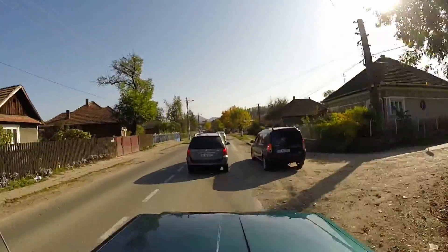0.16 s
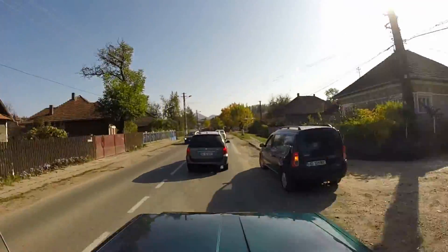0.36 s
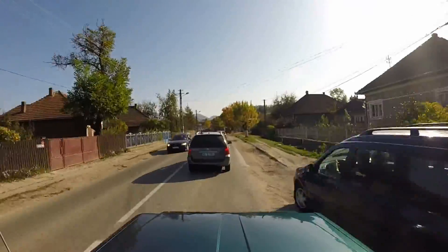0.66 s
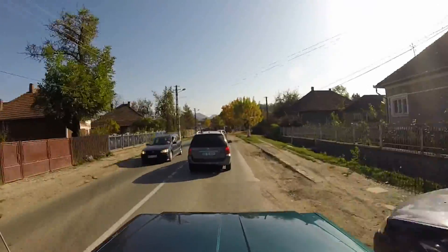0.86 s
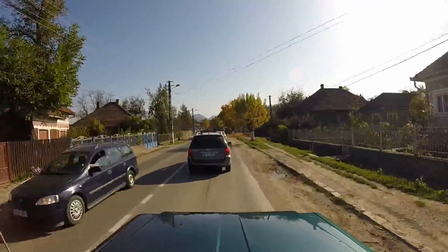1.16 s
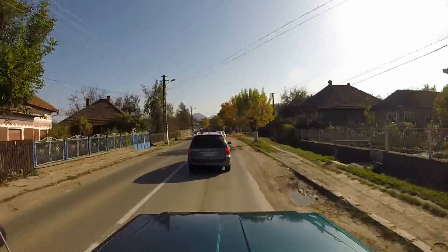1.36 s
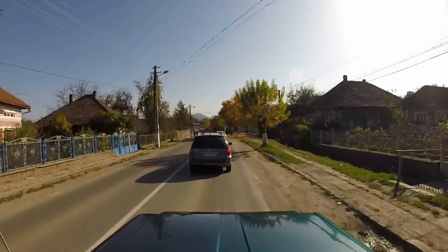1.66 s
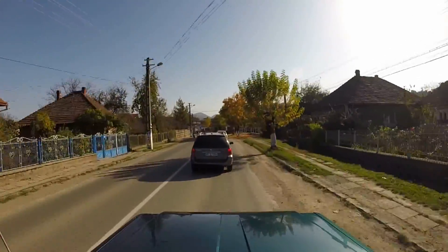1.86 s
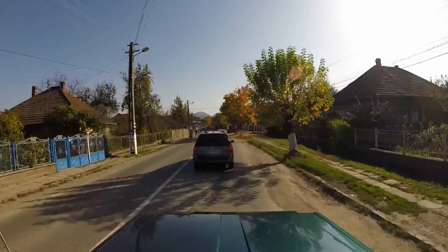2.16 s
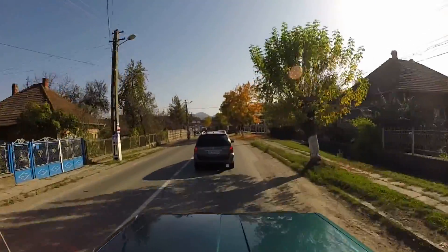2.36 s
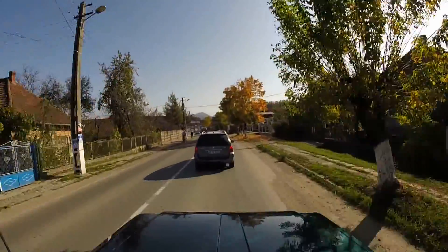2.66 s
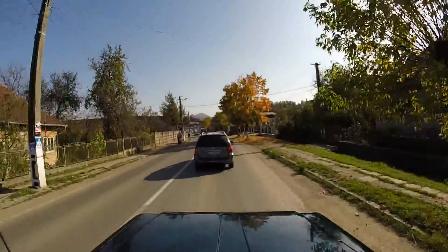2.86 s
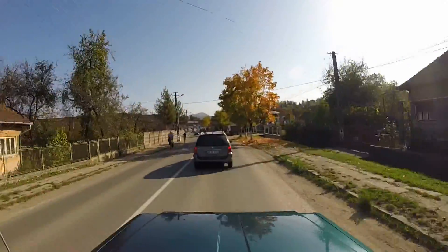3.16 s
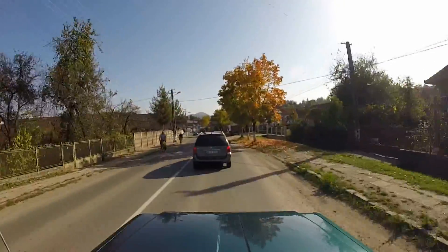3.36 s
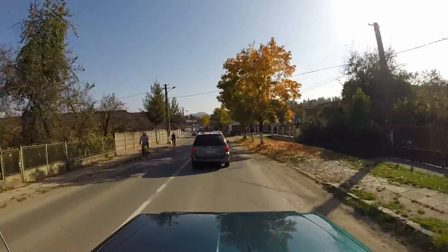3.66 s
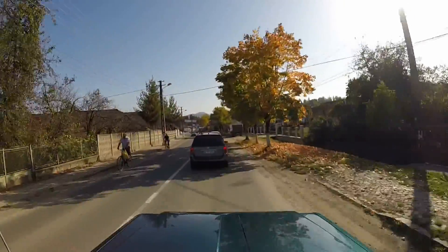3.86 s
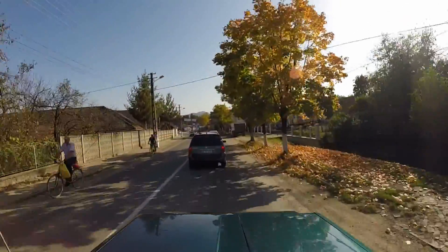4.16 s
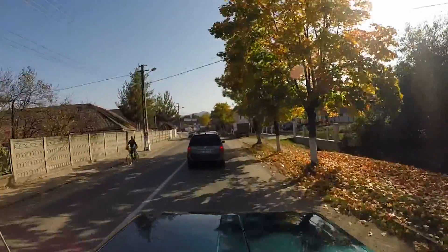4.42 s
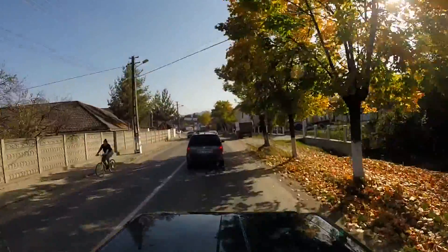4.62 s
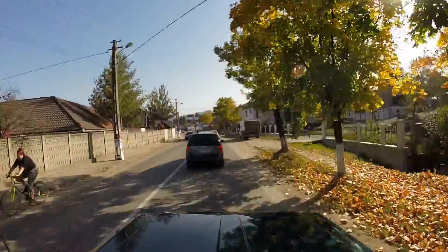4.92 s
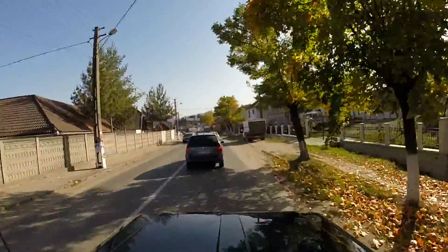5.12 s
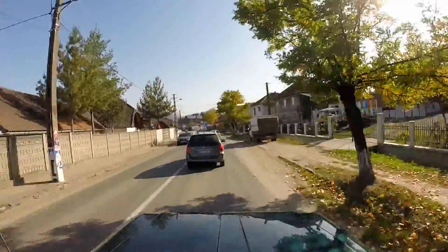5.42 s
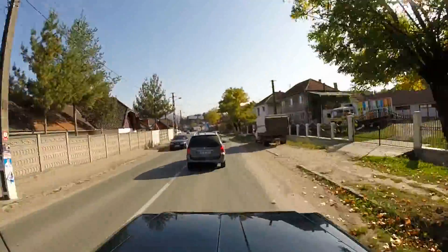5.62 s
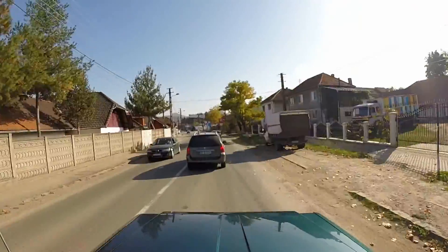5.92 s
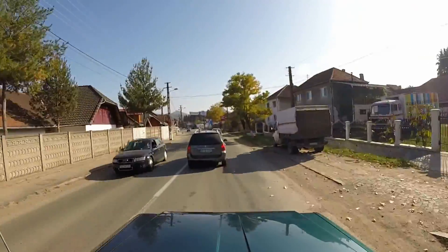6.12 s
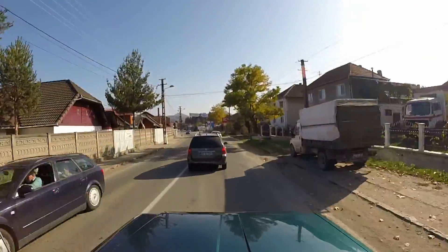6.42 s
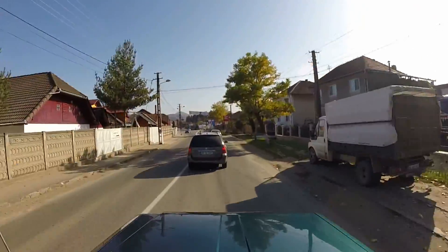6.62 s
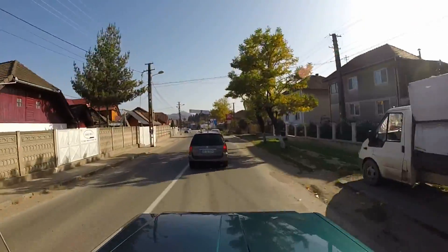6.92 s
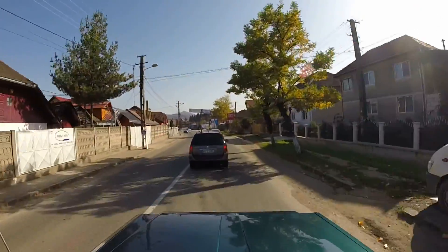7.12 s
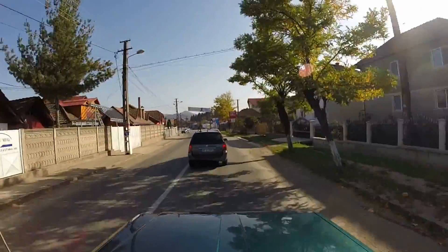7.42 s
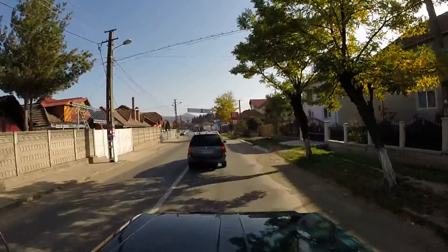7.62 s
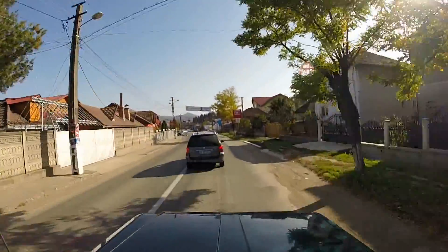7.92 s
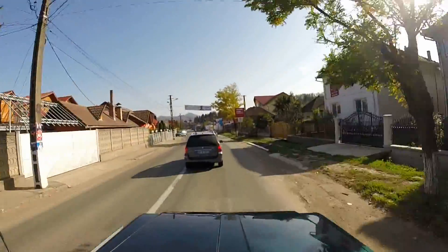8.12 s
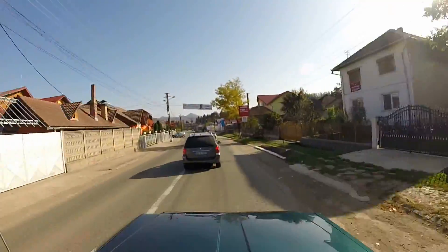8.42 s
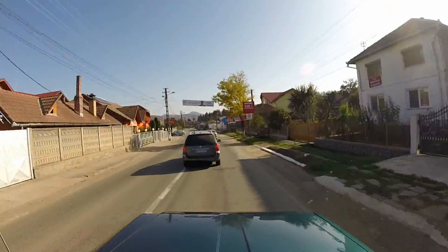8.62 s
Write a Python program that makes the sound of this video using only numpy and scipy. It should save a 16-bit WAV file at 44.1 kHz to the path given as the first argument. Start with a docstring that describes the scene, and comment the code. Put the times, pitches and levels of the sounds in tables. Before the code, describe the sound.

One microphone mounted outdoors on a moving car catches continuous deep boom, humming engine and drive line, and coarse road roar. Crackling puffs of wind crowd the first half, with breathy high hiss and whistle coming and going. Small bumps knock the wheels; two much harder ones thud and rattle, and the whole sound dips after each. Close vehicles pass as short swishes, and the tyres sing faintly towards the end.

```python
"""Booming and humming, an off-road car drives steadily through a village, heard from outside above its bonnet.
The tyres roar and thump over bumps; a parked car throws the noise back briefly, then moving cars
swish by, close to the side. Wind buffets the camera, rasps in its housing in puffs and whistles at an edge.
Body, tyres and wind are coloured noise, shafts and whistles are sines, bumps are struck resonances.
One microphone takes it all; its limiter ducks the whole sound after the two hardest bumps."""
import sys
import numpy as np
from scipy import signal
from scipy.fft import rfft, irfft, next_fast_len
from scipy.io import wavfile
from scipy.ndimage import uniform_filter1d, minimum_filter1d, map_coordinates

SR = 44100
rng = np.random.default_rng(int(sys.argv[2]) if len(sys.argv) > 2 else 0)


def transcribe(signal):
    """Save signal, clipped to [-1, 1], as a 16-bit WAV file at the path in sys.argv[1]."""
    frames = np.atleast_2d(signal).T
    limited = np.clip(frames, -1, 1)
    pcm = np.round(limited * 32767).astype(np.int16)
    wavfile.write(sys.argv[1], SR, pcm)


N = 387193
T = np.arange(N) / SR
# Levels in the tables are relative: the functions trim them. Noise spectra set colour only.


def amp(db):
    """Decibels to gain."""
    return 10 ** (np.asarray(db) / 20)


def unit(x):
    """Scale to rms 1."""
    return x / np.sqrt(np.mean(x ** 2) + 1e-20)


def curves(rows):
    """One value per sample for each column after the time."""
    s, *cols = np.transpose(rows)
    return [np.interp(T, s, c) for c in cols]


def wobble(rate):
    """A smooth random curve, rate knots a second."""
    knots = rng.standard_normal(int(N * rate / SR) + 4)
    return map_coordinates(knots, [T * rate])


def filtered(x, response):
    """x times a response of frequency."""
    size = next_fast_len(N + 8192)
    return irfft(rfft(x, size) * response(np.fft.rfftfreq(size, 1 / SR)), size)[:N]


def noise(spectrum):
    """Noise of rms 1 with the colour of (freq_hz, level_db) points."""
    f, db = np.transpose(spectrum)

    def colour(hz):
        return amp(np.interp(np.log(hz + 1), np.log(f), db))
    return unit(filtered(rng.standard_normal(N), colour))


def even(x, span):
    """Hold the strength of a noise even over span seconds."""
    size = max(int(span * SR), 2)
    power = uniform_filter1d(uniform_filter1d(x ** 2, size), size)
    return x / np.sqrt(np.abs(power) + 1e-4)


def add(track, s, sound):
    """Mix a sound into the track at s seconds."""
    part = track[max(round(s * SR), 0):][:len(sound)]
    part += sound[:len(part)]


def hum(hz, tones, waver_db, rough):
    """The (multiple, level_db) tones of a slightly unevenly turning shaft."""
    phase = 2 * np.pi * np.cumsum(hz) / SR + rough * wobble(18)
    out = np.zeros(N)
    for multiple, db in tones:
        start = rng.uniform(0, 2 * np.pi)
        out += amp(db + waver_db * wobble(6)) * np.sin(multiple * phase + start)
    return out


# air buffeting the camera: start_s, level_db
BUFFETING = [(0.0, -11), (0.07, -19), (0.09, -22.5), (0.9, -13), (0.98, -25.5), (1.56, -13), (1.61, -22.5),
             (2.15, -19.5), (2.25, -32), (2.35, -9.5), (2.52, -27), (2.76, -13), (2.83, -33), (2.93, -24.5),
             (3.54, -38), (3.74, -14.5), (3.86, -24), (4.67, -40), (5.21, -22), (6.77, -26.5), (7.58, -19),
             (8.19, -34), (8.21, -19.5), (8.78, -18.5)]
# the body booming on its springs: start_s, level_db
BOOMING = [(0.0, -17.5), (0.05, -14), (0.12, -21.5), (0.37, -9), (0.41, -19), (0.95, -11), (1.0, -29.5),
           (1.17, -14.5), (1.46, -22.5), (1.71, -10.5), (1.76, -26), (1.91, -15.5), (3.13, -14),
           (3.18, -26), (3.35, -13.5), (3.57, -24), (3.62, -15), (3.89, -19.5), (4.05, -13), (4.11, -24),
           (4.2, -13.5), (4.62, -23.5), (4.89, -13), (4.94, -28), (5.11, -17), (5.7, -14), (6.28, -24.5),
           (6.38, -12), (6.45, -10), (6.51, -20.5), (6.6, -13), (6.92, -22.5), (7.04, -11), (7.09, -22.5),
           (7.29, -23), (7.63, -8.5), (7.7, -29), (7.78, -11.5), (8.29, -21.5), (8.53, -10.5), (8.78, -14)]
# where the boom is centred: start_s, pitch_hz
BOOM_PITCH = [(0, 58), (1.5, 57), (2.4, 61), (3.1, 61), (3.65, 66), (3.95, 68), (4.25, 58), (6.4, 60),
              (7.5, 58), (8.78, 60)]
# noise colours: freq_hz, level_db (per Hz)
BUFFET_SPECTRUM = [(5, -47), (19, -20), (29, -13), (39, -1), (46, 0.5), (58, -26), (110, -47.5),
                   (300, -120)]
BOOM_SPECTRUM = [(30, -42.5), (47, -11.5), (55, -3), (60, 2), (64, 1), (73, -13), (90, -23.5), (160, -53),
                 (400, -120)]
BOOM_HZ = 60  # pitch at which the boom noise plays unshifted


def body():
    """Air buffets the camera and the car body booms on its springs, at a pitch that drifts."""
    (buffet_db,), (boom_db,), (boom_hz,) = curves(BUFFETING), curves(BOOMING), curves(BOOM_PITCH)
    # reading the noise faster or slower moves its pitch
    position = np.cumsum(boom_hz / BOOM_HZ) % N
    boom = np.interp(position, np.arange(N), even(noise(BOOM_SPECTRUM), span=0.12))
    buffet = even(noise(BUFFET_SPECTRUM), span=0.22)
    return amp(buffet_db + 2) * buffet + amp(boom_db + 1.5) * boom


# four-cylinder engine: start_s, firing_hz, firing_db, octave_db, level_db at 2.5 times the firing rate
ENGINE = [(0, 88, -35, -30, -40), (.17, 87, -34, -18, -41), (.6, 84, -36, -31, -39),
          (1.35, 80.3, -34, -33, -41), (1.67, 78, -31.5, -20.5, -44), (2, 77, -22, -30, -36.5),
          (2.35, 76.8, -30, -23, -27.5), (2.85, 76.5, -22, -30, -28.5), (3.4, 76.2, -21, -33.5, -41),
          (3.85, 76.6, -19.5, -18, -30), (4.15, 76.5, -27, -30.5, -25), (4.6, 77, -31, -32.5, -29),
          (5.1, 77.7, -30, -21, -22.5), (5.35, 77.5, -29, -25.5, -43), (5.9, 76.5, -19, -30.5, -41),
          (6.4, 75.5, -25, -21, -36), (6.9, 75, -41, -38.5, -40), (8.78, 73.6, -34, -35, -43)]
# drive line: start_s, pitch_hz, fundamental_db, octave_db
DRIVE_LINE = [(0, 65.47, -22, -26.5), (1.4, 63.7, -27, -31), (1.85, 64.87, -26, -23.5),
              (2.75, 65.28, -26, -26.5), (3.3, 65.6, -26, -30), (3.85, 64.8, -30, -32),
              (4.6, 65.1, -25, -41.5), (5.4, 65.58, -25, -30), (6.3, 65.3, -26, -25.5), (7, 65, -33, -39.5),
              (8.78, 63, -29, -28)]


def engine():
    """The firing drone, whose tones swell in turn, and the hum of the drive line."""
    firing_hz, *firing_db = curves(ENGINE)
    drive_hz, *drive_db = curves(DRIVE_LINE)
    multiples = (1, 2, 2.5)
    firing = hum(firing_hz, zip(multiples, firing_db), waver_db=1.6, rough=0.07)
    # the drive line has only the first two tones
    drive = hum(drive_hz, zip(multiples, drive_db), waver_db=2.0, rough=0.072)
    return firing + drive


# the road surface under the wheels: start_s, rumble_db, roar_db
ROAD = [(0, -28.5, -38.5), (.7, -24.5, -46), (1.02, -25.5, -42), (1.2, -23, -42.5), (1.7, -26.5, -45.5),
        (2.15, -28.5, -42), (2.75, -26, -45), (3.1, -26.5, -41.5), (3.55, -26.5, -41.5),
        (3.85, -24.5, -41.5), (4.5, -28.5, -48), (4.9, -29, -43), (5.2, -23, -41), (5.95, -26.5, -40),
        (6.5, -21.5, -40.5), (7.1, -27, -44), (7.5, -23.5, -40.5), (8, -25, -41.5), (8.45, -20.5, -39),
        (8.78, -25.5, -42)]
# the air in the tyres droning: start_s, level_db
DRONING = [(0, -59), (3.3, -52.5), (5.2, -49.5), (6.3, -45), (7, -47), (7.6, -41), (8.78, -49)]
# the tyre tread singing on the later stretch, sinking: start_s, pitch_hz, level_db
TREAD = [(5.2, 223.3, -49), (6, 218, -32), (6.3, 209.5, -28), (6.9, 207.6, -43), (7.6, 203.6, -31.5),
         (8.2, 199.7, -26), (8.78, 196.5, -30)]
# tones of the tread: multiple (of its pitch), level_db
TREAD_TONES = [(1, 0), (1.25, -17.5), (1.5, -18.5)]
# noise colours: freq_hz, level_db (per Hz)
RUMBLE_SPECTRUM = [(50, -22), (95, 0), (117, -4), (131, -1.5), (143, -3), (156, -2), (171, 0.5),
                   (183, -3.5), (200, -5), (250, -20), (340, -33), (600, -32.5), (2000, -120)]
DRONE_SPECTRUM = [(200, -18.5), (255, 0.5), (295, 2), (340, -10.5), (430, -23.5), (1000, -91)]
TYRE_SPECTRUM = [(120, -27), (280, -1), (350, -1.5), (470, 1.5), (512, 2.5), (547, 7.5), (585, 0.5),
                 (630, -2.5), (850, -6.5), (1200, -9.5), (2500, -6.5), (5000, -31), (15000, -57.5)]


def road():
    """Coarse asphalt shakes the chassis and makes the tyres drone, sing and roar."""
    rumble_db, roar_db = curves(ROAD)
    tread_hz, tread_db = curves(TREAD)
    rumble = amp(rumble_db + 0.8 + 1.3 * wobble(18)) * even(noise(RUMBLE_SPECTRUM), span=0.11)
    drone = amp(curves(DRONING)[0] - 3) * noise(DRONE_SPECTRUM)
    tones = [(multiple, tread_db + db) for multiple, db in TREAD_TONES]
    tread = hum(tread_hz, tones, waver_db=1.0, rough=0.31)
    roar = amp(roar_db + 2.5 + 0.52 * wobble(40)) * noise(TYRE_SPECTRUM)
    return rumble + drone + tread + roar


WHISTLE_FLATNESS = 6.3  # how level the middle of a swell stays


def arch(length):
    """A flat-topped swell of length seconds and its distance from the middle, 0-1."""
    off = np.abs(np.linspace(-1, 1, int(length * SR)))
    return 1 - off ** WHISTLE_FLATNESS, off


# steady air rasping in the housing: start_s, lower_db, upper_db (its two resonances)
AIRSTREAM = [(0, -44.5, -42), (1.4, -45.5, -48), (1.75, -46.5, -44), (1.88, -45, -54), (2.1, -45, -40),
             (2.23, -46, -49), (2.4, -45, -36), (2.6, -45, -55), (2.72, -42.5, -39), (2.88, -50, -53),
             (3.02, -43.5, -39), (3.3, -41.5, -50.5), (3.7, -46.5, -44), (4, -40, -42.5), (4.42, -46, -37),
             (4.52, -42.5, -45.5), (4.7, -44.5, -43), (5.2, -44, -47), (6.3, -46, -44.5), (7.1, -46.5, -47),
             (7.9, -45.5, -49.5), (8.78, -53.5, -59)]
# sudden puffs of wind: start_s, length_s, lower_db, upper_db
PUFFS = [(0.069, 0.011, -35, -44), (0.119, 0.0077, -46, -32), (0.228, .014, -41, -31),
         (0.238, 0.045, -35, -38), (0.358, 0.011, -43, -34), (0.604, 0.0096, -45, -33),
         (0.642, 0.017, -47, -33), (0.72, 0.04, -33.5, -43), (0.895, 0.024, -44, -33.5),
         (0.995, 0.026, -36, -35.5), (1.244, .08, -33.5, -35), (1.611, .01, -39, -30.5),
         (1.636, 0.0071, -43, -35), (1.674, 0.081, -36, -36), (1.704, 0.0074, -33, -50),
         (1.749, 0.049, -41, -34.5), (1.799, 0.014, -28.5, -42), (1.845, 0.013, -40, -40.5),
         (1.954, 0.011, -29.5, -30), (1.97, .022, -37, -32), (2.012, 0.027, -36, -29.5),
         (2.063, 0.081, -33, -31.5), (2.09, 0.011, -41, -40), (2.15, 0.032, -40, -49),
         (2.175, 0.014, -33, -33.5), (2.258, 0.011, -24, -29.5), (2.27, 0.027, -29.5, -29),
         (2.305, 0.088, -38, -37), (2.348, 0.031, -40, -41), (2.43, 0.045, -36, -29),
         (2.5, 0.0094, -27, -26), (2.517, 0.037, -30.5, -32.5), (2.62, 0.058, -32, -47),
         (2.684, .015, -49, -34.5), (2.945, .01, -30, -32.5), (2.961, 0.022, -31, -32),
         (3.035, 0.032, -44, -39), (3.082, .02, -42, -33), (3.124, 0.024, -31.5, -32.5),
         (3.229, 0.015, -32, -34.5), (3.267, 0.013, -33, -33), (3.282, 0.023, -34, -34),
         (3.301, 0.025, -44, -31.5), (3.411, 0.034, -34, -39), (3.445, .022, -34, -30.5),
         (3.718, 0.027, -40, -50), (3.791, .015, -34, -39), (3.918, .012, -39, -38),
         (3.996, 0.013, -31, -37.5), (4.025, 0.055, -47, -45), (4.197, .02, -41, -37.5),
         (4.238, .02, -38, -35), (4.327, 0.011, -47, -38), (4.413, 0.018, -40, -37),
         (4.579, 0.028, -35, -29.5), (4.664, 0.076, -34, -33), (4.717, 0.024, -45, -40),
         (4.775, 0.09, -40, -41), (5.077, 0.028, -32.5, -36), (5.109, 0.011, -42, -33.5),
         (5.133, .009, -37, -34), (5.175, 0.014, -29, -37), (5.572, 0.037, -34, -34),
         (5.593, 0.0098, -47, -28.5), (5.627, 0.019, -32, -40), (5.676, 0.013, -35, -37),
         (6.113, .02, -39, -44), (6.19, .025, -37, -42), (6.257, 0.074, -38.5, -35.5),
         (6.3, 0.016, -32, -48), (6.441, 0.069, -35, -35), (6.518, 0.11, -32, -29.5),
         (6.779, 0.021, -44, -36.5), (6.825, .025, -38, -40), (6.862, 0.06, -37, -32.5),
         (7.13, 0.03, -41, -44), (7.47, 0.05, -31.5, -36.5), (7.492, 0.023, -50, -33),
         (7.565, 0.11, -35.5, -32), (7.601, .052, -38, -29.5), (7.723, 0.05, -40, -40),
         (7.768, 0.055, -38, -35.5), (8.211, 0.063, -35, -41.5), (8.34, 0.07, -34.5, -39.5),
         (8.429, 0.026, -36, -32.5)]
# spells of smooth air, hissing here, whistling below: start_s, length_s, top_hz, whistle_db, hiss_db
WHISTLES = [(0, .24, 8460, -66, -56.5), (0.23, 0.16, 9350, -65, -56.5), (0.364, 0.38, 9300, -68, -59),
            (0.713, 0.12, 9900, -65, -57.5), (0.824, 0.13, 7800, -72, -62), (0.935, 0.3, 9650, -67, -55),
            (1.302, 0.41, 7900, -65, -62.5), (1.991, 0.098, 7060, -68, -58.5),
            (2.334, .23, 6970, -76, -61.5), (2.635, 0.084, 7900, -66, -66), (2.668, 0.15, 6585, -67, -68),
            (2.96, 0.16, 7410, -69, -60), (3.12, 0.14, 6855, -65, -63), (3.398, 0.51, 7300, -63.5, -59.5),
            (4.54, 0.046, 7960, -62, -74), (4.61, 0.27, 6480, -65, -65), (4.87, 0.67, 7900, -63.5, -58),
            (5.616, 0.46, 7900, -62, -57.5), (6.08, 0.49, 6380, -63.5, -64), (6.86, .26, 6500, -73, -64),
            (7.27, 0.24, 6860, -66, -62), (7.569, 0.12, 6600, -57.5, -69), (7.746, 0.42, 6520, -63.5, -63),
            (8.304, 0.096, 7460, -65, -59), (8.388, 0.41, 6400, -65.5, -64)]
# noise colours of lower and upper resonance, hiss and spit: freq_hz, level_db (per Hz)
RASP_SPECTRUM = [(300, -26.5), (800, -17.5), (1150, -8), (1450, 7), (1750, 4), (2150, -7), (2750, -15),
                 (3500, -20.5), (5000, -25), (5850, -15.5), (9000, -53), (15000, -77.5)]
SIZZLE_SPECTRUM = [(1700, -45.5), (2300, 1), (2750, 9), (3350, 6), (3900, -5.5), (5000, -20), (5850, -11.5),
                   (7000, -31.5), (9000, -56), (15000, -81)]
HISS_SPECTRUM = [(1500, -6), (4000, 10.5), (5100, -3), (5850, 8), (6600, 1), (8400, 1), (9100, -2.5),
                 (9700, -0.5), (10300, -7.5), (11000, -3.5), (12000, -18), (15000, -29)]
SPIT_SPECTRUM = [(2800, -36), (4200, 9.5), (5100, -4), (5900, -2), (7500, -8.5), (10500, -21.5),
                 (13000, -40.5)]
HISS_FLOOR_DB, SMOOTH_RASP_DB = -68, 3.5  # hiss between spells, before its trim; extra rasp during them
# attack of a puff of typical length; its growth with length; shortest attack
PUFF_ATTACK_S, PUFF_SLOWING, PUFF_FASTEST_S = .005, 1.3, .005
PUFF_TYPICAL_S, PUFF_COLLAPSE = 0.048, 3.77  # typical length; steepness of the end


def wind():
    """Turbulent air rasps in the housing's lower and upper resonances; smooth air hisses over it."""
    low_db, high_db = curves(AIRSTREAM)
    low_puffs, high_puffs, smooth, hiss_gain = np.zeros((4, N))
    t = T[:SR // 3]
    for s, length, lower_db, upper_db in PUFFS:
        # short puffs snap and long ones swell; each holds for its length and collapses
        attack = max(PUFF_FASTEST_S, PUFF_ATTACK_S * (length / PUFF_TYPICAL_S) ** PUFF_SLOWING)
        puff = np.tanh(t / attack) / np.hypot(1, (t / length) ** PUFF_COLLAPSE)
        add(low_puffs, s, amp(lower_db) * puff)
        add(high_puffs, s, amp(upper_db) * puff)
    for s, length, _, _, hiss_db in WHISTLES:
        swell, _ = arch(length)
        add(smooth, s, swell)
        add(hiss_gain, s, amp(hiss_db) * swell)
    # the stream between the puffs is never quite steady
    stream_db = SMOOTH_RASP_DB * np.minimum(smooth, 1) + 1.0 * wobble(22)
    low_gain = np.hypot(amp(low_db + stream_db - 0.5), amp(-3.0) * low_puffs)
    low = noise(RASP_SPECTRUM) * low_gain * amp(0.22 * wobble(70))
    high_stream = amp(high_db + stream_db - 5.0 + 0.93 * wobble(32))
    high_gain = np.hypot(high_stream, amp(-2.0) * high_puffs)
    high = noise(SIZZLE_SPECTRUM) * high_gain * amp(1.6 * wobble(80))
    # small eddies make the whole rasp flutter
    flutter = amp(1.1 * wobble(70) + 1.4 * wobble(260))
    hiss_level = np.hypot(hiss_gain, amp(HISS_FLOOR_DB + 1.2 * wobble(12)))
    hiss = noise(HISS_SPECTRUM) * hiss_level * amp(7.0 + 2.1 * wobble(60))
    # puffs also spit in the treble, weak ones proportionally less
    spit_gain = high_puffs * np.sqrt(np.minimum(1, high_puffs / amp(-38.5)))
    spit = noise(SPIT_SPECTRUM) * spit_gain * amp(-23 + 3.9 * wobble(110))
    return flutter * (low + high + spit) + hiss


# breath around the whistle, as offset from its pitch: freq_hz, level_db (per Hz)
SKIRT_SPECTRUM = [(20, -2.5), (200, -9), (450, 0.0), (900, -9.5), (2000, -45.5), (5000, -87)]
WHISTLE_SAG = 0.14  # share of the pitch lost at both ends of a spell


def whistle():
    """Vortices shed at an edge: a breathy band, its pitch rising and falling with each spell."""
    out = np.zeros(N)
    skirt = noise(SKIRT_SPECTRUM)
    warble = 1 + 0.022 * wobble(45)
    for s, length, top_hz, db, _ in WHISTLES:
        swell, off = arch(length)
        now = (round(s * SR) + np.arange(len(swell))) % N
        hz = top_hz * (1 - WHISTLE_SAG * off ** 3) * warble[now]
        phase = 2 * np.pi * np.cumsum(hz) / SR
        add(out, s, amp(db + 9.5) * swell * skirt[now] * np.sin(phase))
    return out * amp(1.4 * wobble(40))


# thin clear whistles at the edge: start_s, length_s, start_hz, end_hz, level_db
CHIRPS = [(0, 0.11, 8300, 8500, -50), (.245, 0.055, 7900, 10000, -53), (.342, .072, 8250, 8400, -54),
          (0.71, .035, 7800, 9000, -53), (0.93, 0.075, 6960, 9800, -59), (2.645, 0.037, 8200, 7560, -53),
          (2.69, 0.1, 6910, 6400, -57), (3.15, .075, 6900, 6800, -55), (4.535, .04, 7200, 8540, -55),
          (8.312, 0.044, 6450, 8190, -52), (8.405, 0.03, 6900, 7400, -52)]


def chirps():
    """For moments the shedding locks into a thin, wavering tone."""
    out = np.zeros(N)
    waver = 1 + .018 * wobble(75) + .008 * wobble(900)
    for s, length, start_hz, end_hz, db in CHIRPS:
        swell, _ = arch(length)
        now = (round(s * SR) + np.arange(len(swell))) % N
        hz = np.linspace(start_hz, end_hz, len(swell)) * waver[now]
        add(out, s, amp(db) * swell * np.sin(2 * np.pi * np.cumsum(hz) / SR))
    return out * amp(2.3 * wobble(120))


WHINE_HZ, WHINE_FLOOR_DB, WHINE_SWELL_DB = 3400, -66, -57.5  # the swell adds to the floor
WHINE_AT_S, WHINE_LENGTH_S = 6.5, 2  # the one swell


def whine():
    """A faint high whine, a slightly wavering sine, swells once and fades."""
    gain = np.full(N, amp(WHINE_FLOOR_DB))
    add(gain, WHINE_AT_S, amp(WHINE_SWELL_DB) * arch(WHINE_LENGTH_S)[0])
    waver, drift = amp(1.5 * wobble(7)), 1 + .0025 * wobble(40)
    return gain * waver * np.sin(2 * np.pi * np.cumsum(WHINE_HZ * drift) / SR)


def ring(modes, attack):
    """One second of struck (freq_hz, level_db, t60_s) modes, a little different each time."""
    t = T[:SR]
    tones = np.zeros(SR)
    for hz, db, t60 in modes:
        tones += amp(db + rng.normal(0, 1) - 60 * t / t60) * np.sin(2 * np.pi * hz * t)
    return tones * (1 - np.exp(-t / attack))


# wheels meet bumps: start_s, knock_db, thud_db, clatter_db, rebound_db (over the first blow)
BUMPS = [(0.555, -27, -14, -30, 1.5), (1.392, -17, -14.5, -48, -1), (1.845, -13, -13, -44, 1),
         (2.761, -15, -10, -27.5, 0), (3.01, -17, -19, -44, 2), (4.144, 3, 5.5, -31, -0.5),
         (5.1, -14, -9.5, -48, -1), (6.549, 3.5, 5, -24, 0.5)]
# the first blow, then the wheel chattering after it: delay_s, ring_db (panels), heave_db (spring)
REBOUNDS = [(.003, 0.5, 6.5), (.033, 1, 1), (0.078, 0, -8)]
# the suspension, struck by the wheel: freq_hz, level_db, t60_s
SUSPENSION = [(220, -1, 0.049), (306, -7, 0.055), (368, -11, 0.045), (479.4, -24.5, 0.22),
              (550, -26.5, 0.11), (637, -28.5, .1)]
# the body panels: freq_hz, level_db, t60_s
PANELS = [(63.5, -4.5, 0.35), (97.4, -1.5, 0.2), (112, -7, 0.15), (150, 1, 0.22), (168.8, 0.5, 0.27),
          (189.2, -6.5, 0.17), (227.3, -13.5, 0.18)]
# colour of the loose parts: freq_hz, level_db (per Hz)
CLATTER_SPECTRUM = [(200, -9), (420, -1.0), (540, 6.0), (650, -3.0), (820, -7.5), (1200, -11.5),
                    (3000, -17.0), (9000, -66.0)]
SPRING_HZ, HEAVE_LAG_S = 79.6, 0.00654  # the suspension's heave; how long it follows each blow


def bumps():
    """Bumps ring the suspension and shake loose parts; blow and rebounds load spring and panels."""
    out, t = np.zeros(N), T[:SR]
    clatters = noise(CLATTER_SPECTRUM)
    heave = -np.sin(2 * np.pi * SPRING_HZ * t) * amp(-60 * t / 0.04) * (1 - np.exp(-t / 0.003))
    for s, knock_db, thud_db, clatter_db, rebound_db in BUMPS:
        clatter = np.roll(clatters, -round(s * SR))[:SR]
        rattle = amp(-60 * t / 0.22) * (1 - np.exp(-t / 0.0018))
        add(out, s, amp(clatter_db) * clatter * rattle)
        add(out, s, amp(knock_db) * ring(SUSPENSION, attack=0.0049))
        for i, (delay, ring_db, heave_db) in enumerate(REBOUNDS):
            blow_db = thud_db + (rebound_db if i else 0)
            add(out, s + delay, amp(blow_db + ring_db - 8.5) * ring(PANELS, attack=0.0079))
            add(out, s + delay + HEAVE_LAG_S, amp(blow_db + heave_db) * heave)
    return out


# a parked car throwing the noise back, then two moving cars, close to the side:
# middle_s (nearest point), level_db, half_length_s, fizz_db (treble)
PASSES = [(0.758, -36.5, 0.018, -58), (1.305, -49, 0.27, -71), (6.362, -50, 0.13, -54.5)]
# noise colours of swish and treble fizz: freq_hz, level_db (per Hz)
SWISH_SPECTRUM = [(200, -21), (500, -7.5), (850, 5), (1200, -9), (2200, 2), (4000, -18.5), (7000, -19),
                  (12000, -33.5), (15000, -39)]
FIZZ_SPECTRUM = [(3000, -16), (6000, 7), (9000, -2), (11500, -7.5), (13500, -13), (15000, -16),
                 (15700, -30.5)]
# where the treble peaks and ends, in half lengths after the nearest point; how abruptly
FIZZ_PEAK, FIZZ_END, FIZZ_STEEPNESS = .3, 1.1, 5


def passes():
    """Noise from a parked or moving car swells and fades with distance; its treble is cut off behind."""
    swish, fizz = np.zeros((2, N))  # powers
    for s, db, half, fizz_db in PASSES:
        along = (T - s) / half
        swish += amp(db) ** 2 / (1 + along ** 2)
        cutoff = (1 - np.tanh(FIZZ_STEEPNESS * (along - FIZZ_END))) / 2
        fizz += amp(fizz_db) ** 2 / (1 + (along - FIZZ_PEAK) ** 2) * cutoff
    return np.sqrt(swish) * noise(SWISH_SPECTRUM) + np.sqrt(fizz) * noise(FIZZ_SPECTRUM)


def scene():
    """Everything reaches the one microphone on the car."""
    car = body() + engine() + road() + bumps()
    air = wind() + whistle() + chirps() + whine()
    return (car + air + passes())[None]


LIMITER_HOLD_S, LIMITER_RELEASE_DB_PER_S = 0.12, 8  # the gain stays down, then creeps back
LIMITER_SLOW_ABOVE_DB = 3.5  # smaller overshoots are caught and let go at once
TOP_HZ = 15700  # upper end of the microphone's band


def record(dry):
    """The limiter catches peaks, ducks after a hard bump and recovers slowly; the band ends steeply."""
    ceiling = .95
    over_db = 20 * np.log10(np.maximum(1, np.abs(dry[0]) / ceiling))
    hold, ramp = int(LIMITER_HOLD_S * SR), SR // 100
    # the largest excess of the last moments
    held_db = -minimum_filter1d(LIMITER_SLOW_ABOVE_DB - over_db, size=hold, origin=(hold - 1) // 2)
    release_db = LIMITER_RELEASE_DB_PER_S * T
    slow_db = np.maximum.accumulate(held_db + release_db) - release_db
    duck_db = np.maximum(over_db, slow_db)
    gain = uniform_filter1d(minimum_filter1d(amp(-duck_db), size=2 * ramp), size=ramp)
    # short fades at both ends
    fade = np.minimum(1, np.minimum(np.arange(N), np.arange(N)[::-1]) / ramp)
    lowpass = signal.ellip(10, .1, 90, TOP_HZ, fs=SR, output="sos")
    return signal.sosfilt(lowpass, dry * gain * fade)


dry = scene()
out = record(dry)
transcribe(out)
```